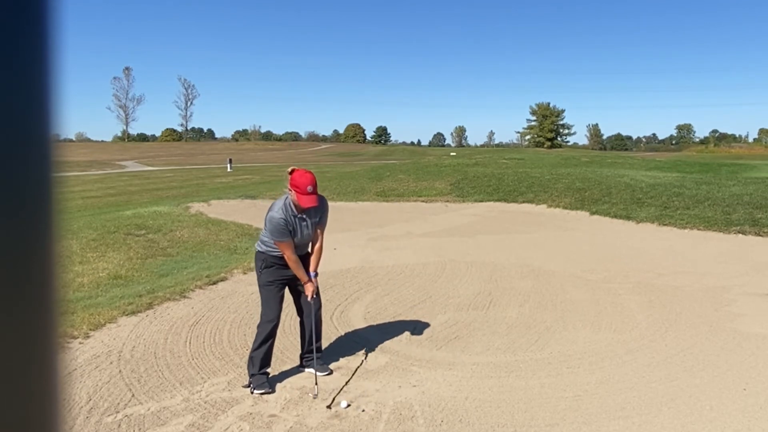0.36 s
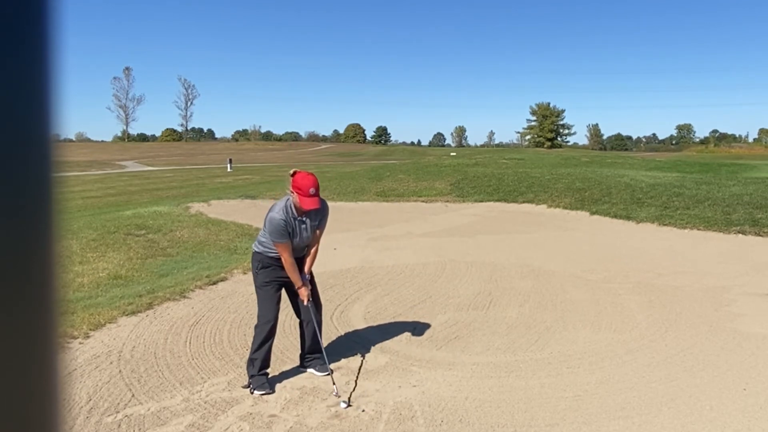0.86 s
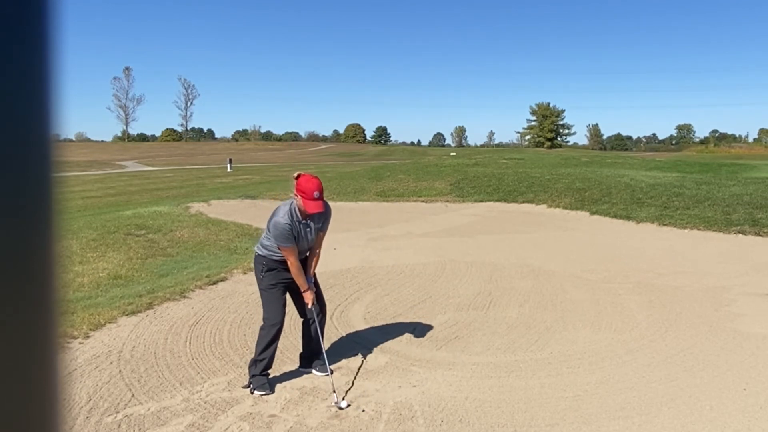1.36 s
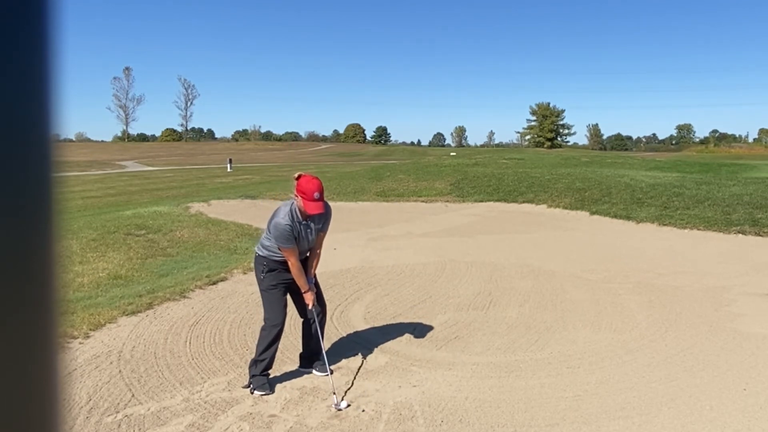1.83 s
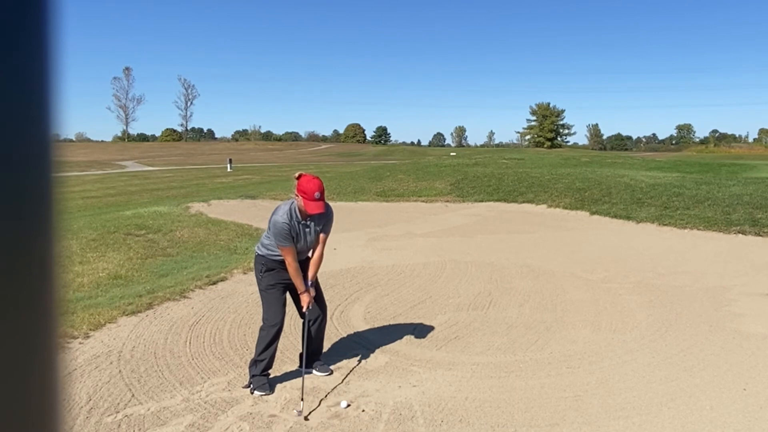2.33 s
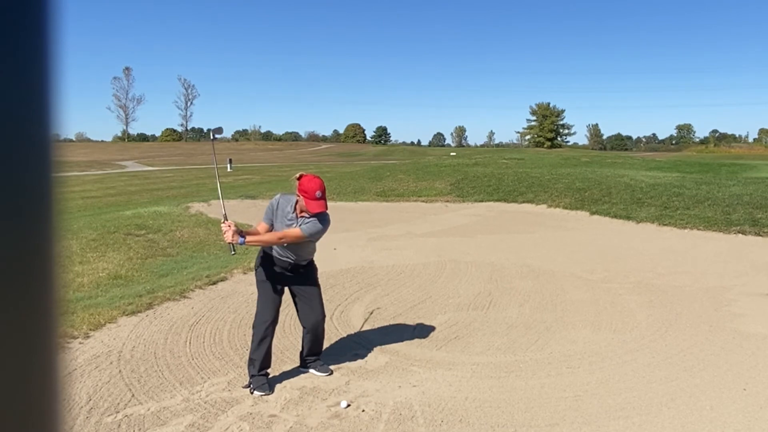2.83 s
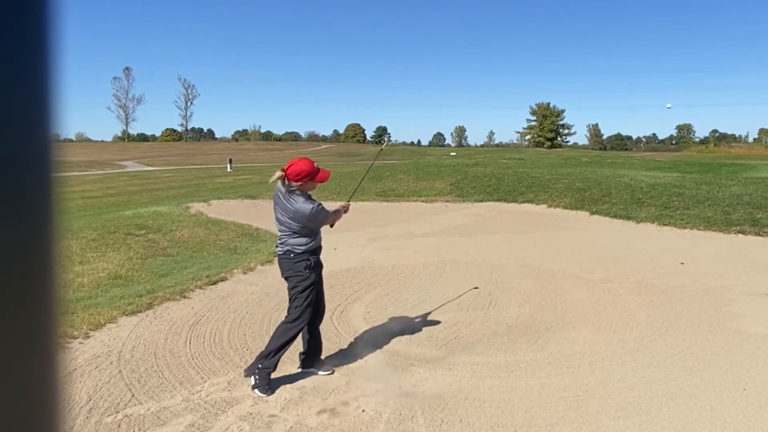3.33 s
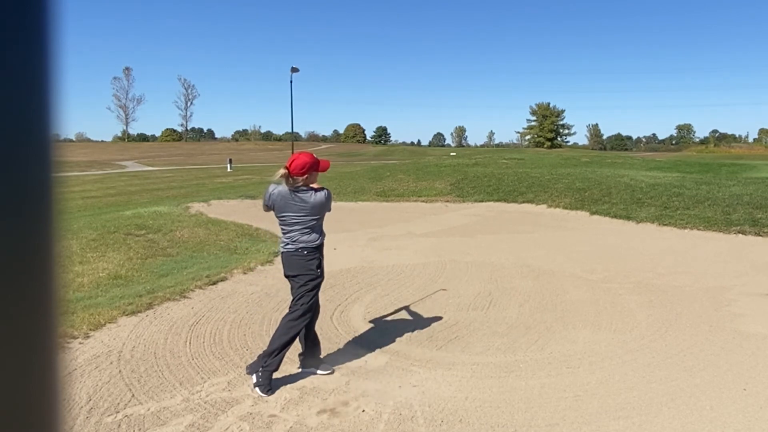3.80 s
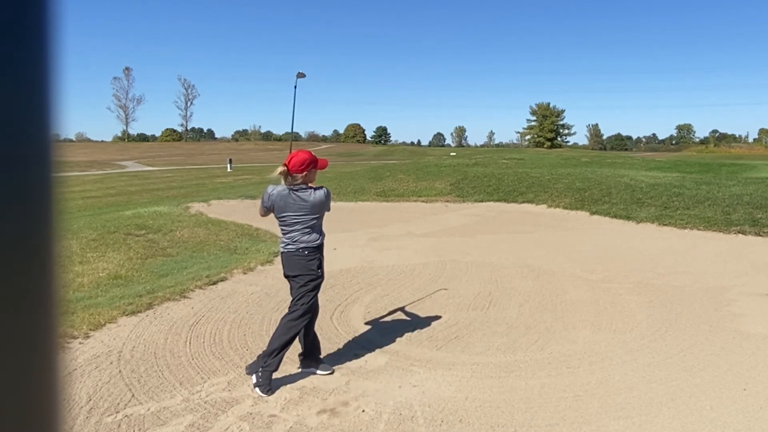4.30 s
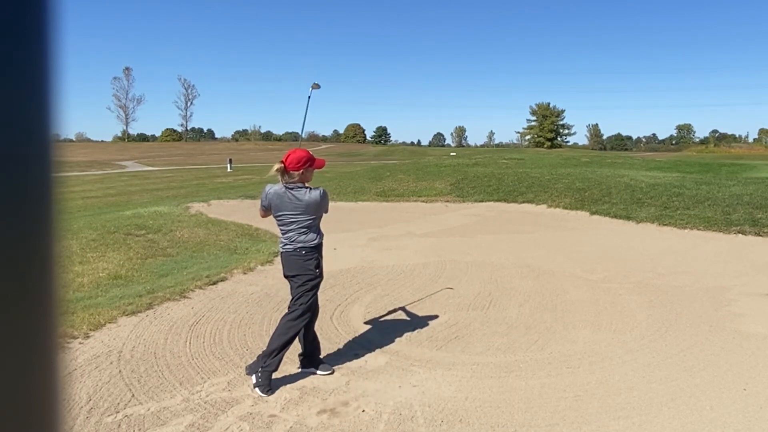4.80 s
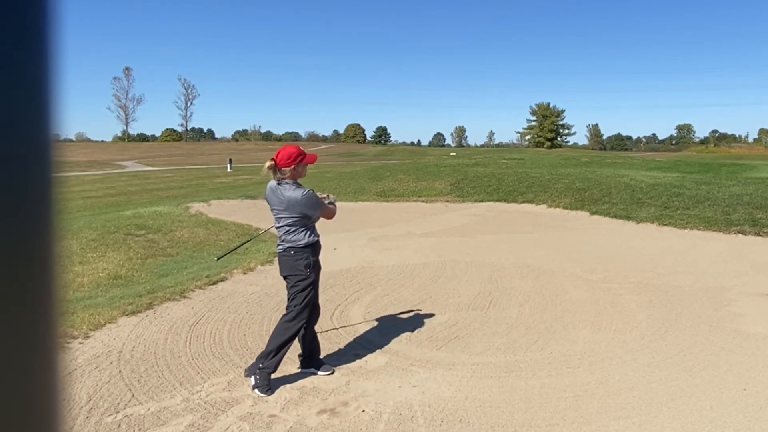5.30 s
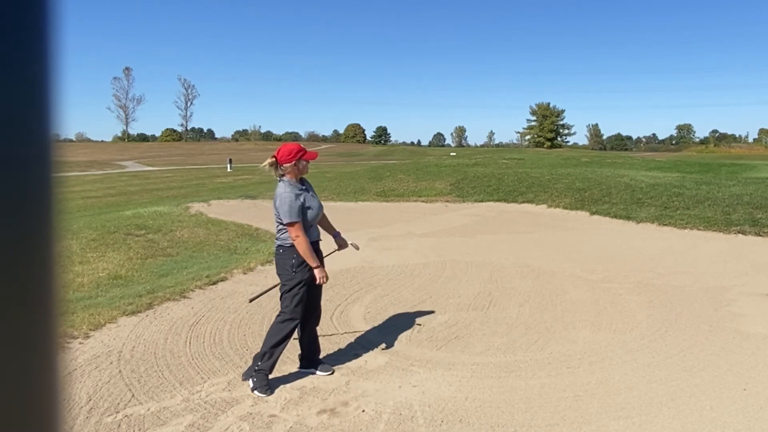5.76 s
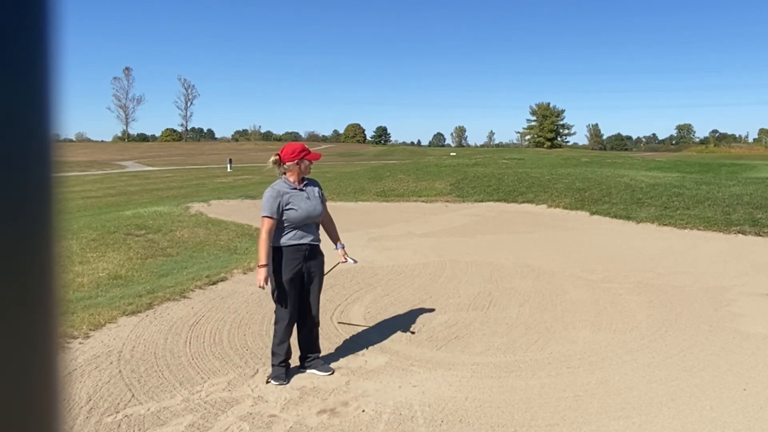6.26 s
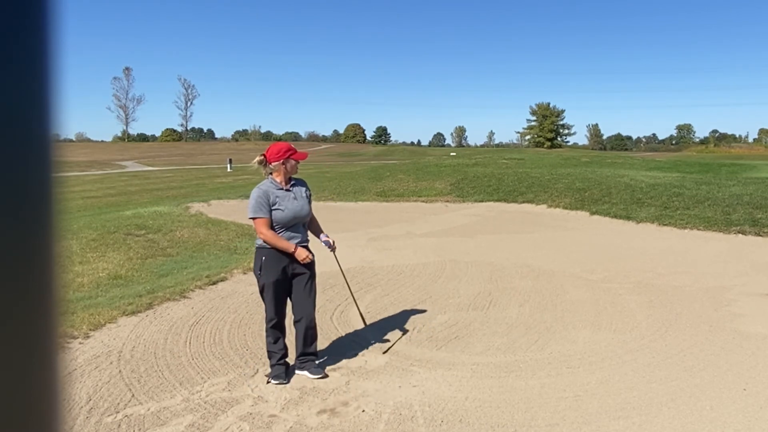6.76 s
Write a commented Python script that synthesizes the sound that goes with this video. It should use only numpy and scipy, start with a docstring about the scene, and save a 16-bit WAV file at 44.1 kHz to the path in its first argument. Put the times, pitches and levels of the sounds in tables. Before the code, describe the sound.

A stereo outdoor microphone picks up a bright bed of crickets, thin hiss of open air, soft low wind bumps and far road hum. One sharp, dry club strike in sand stands out near the middle, followed by a faint grainy spray and small clods landing. The insects continue unchanged, with a few faint gliding bird whistles far off and quiet gritty shuffles at the end.

```python
"""A golf wedge slaps into bunker sand and strikes the ball: bursts of noise, then short decaying sines.
Thrown sand rains back and feet shift later: grain-flickered noise with single knocks and clods.
Crickets of three kinds sing in strokes of arching pitch; far birds whistle gliding sines.
Shaped noise gives a light wind buffeting two microphone ports, a distant road on the right,
a low hum and the hiss of open air."""
import sys
import numpy as np
from scipy import signal
from scipy.io import wavfile
from scipy.ndimage import uniform_filter1d

SR = 44100
rng = np.random.default_rng(int(sys.argv[2]) if len(sys.argv) > 2 else 0)


def linear_from_db(decibels):
    """Turn decibels (scalar or array-like) into linear amplitude factors; 0 gives 1."""
    return 10 ** (np.asarray(decibels, float) / 20)


def pcm_store(signal):
    """Save signal as 16-bit PCM."""
    levels = np.round(np.clip(np.atleast_2d(signal), -1, 1) * 32767)
    wavfile.write(sys.argv[1], SR, levels.astype(np.int16).T)


N = 303285


def read(points, hz):
    """Value of a table on a log-frequency axis."""
    f, value = np.transpose(points)
    return np.interp(np.log(hz + 1), np.log(f + 1), value)


def amp_at(points, hz):
    """Gain of a spectrum table at the frequencies hz."""
    return linear_from_db(read(points, hz))


def curve(rows, column=1):
    """A column of a table at every sample."""
    return np.interp(np.arange(N) / SR, np.transpose(rows)[0], np.transpose(rows)[column])


def evened(x):
    """Scales to rms 1."""
    return x / np.sqrt(np.mean(x ** 2) + 1e-20)


def alike(likeness):
    """Left-right likeness that is the same at all frequencies."""
    return lambda hz: np.full_like(hz, likeness)


def add(mix, s, sound, pan_db=0, lag_s=0):
    """Mixes a sound in at s seconds; the left port may hear it later and louder."""
    for port, start, db in zip(mix, (s + lag_s, s), (pan_db / 2, -pan_db / 2)):
        at = round(start * SR)
        part = port[max(at, 0):max(at + len(sound), 0)]
        part += linear_from_db(db) * sound[max(-at, 0):][:len(part)]


def noise(colour, same, lag_s=0, patchy_db=0, size=1024, count=N):
    """Random short-time spectra with drifting patches, partly shared by the two ports; rms 1."""
    frames, hz = 4 * count // size + 5, np.fft.rfftfreq(size, 1 / SR)
    a, b, c, d, patches = rng.standard_normal((frames, len(hz), 5), dtype=np.float32).T
    patches = uniform_filter1d(patches, size=10, axis=0)
    patches = evened(uniform_filter1d(patches, size=8, axis=1))
    same = np.clip(same(hz), -1, 1)[:, None]
    right, own = a + 1j * b, c + 1j * d
    late = np.exp(-2j * np.pi * hz * lag_s)[:, None]
    left = same * late * right + np.sqrt(1 - same ** 2) * own
    z = np.array([left, right])
    z *= amp_at(colour, hz)[:, None] * linear_from_db(patchy_db * patches)
    sound = signal.istft(z, nperseg=size, noverlap=size * 3 // 4)[1]
    return evened(sound[:, :count])


# sand noise spectrum: (frequency [Hz], gain [dB])
ENTRY_COLOUR = [(88, -33.5), (150, -6), (583, -6), (1330, -8), (4180, -26), (4970, -35), (5570, -24.5),
                (6490, -26), (11500, -33.5), (14500, -39.5)]
# thin tick of first contact: (frequency [Hz], level [dB], t60 [s])
FACE = [(11400, -31, 0.0058), (13340, -33, .004)]
# club head and ball: (frequency [Hz], level re strike [dB], t60 [s], first swing: 1 outward, -1 inward)
CLUB = [(240, -13, .025, 1), (384, -7.5, 0.021, -1), (684.4, -4.5, 0.015, 1), (812.5, -16, .014, 1),
        (1110, -3.5, 0.012, -1), (1360, -3.5, 0.0076, -1), (1570, -13, .009, 1), (1850, -10, 0.015, -1),
        (2454.3, -7.5, .006, 1), (3745, -4, .018, 1), (5355, -6.5, 0.0079, 1), (6310, -29.5, .014, -1),
        (7204, -14, .005, 1), (8700, -27.5, .009, -1)]
# delay of the left port: (frequency [Hz], lag [s])
CLUB_LAG = [(400, .00011), (1300, .00007), (2500, 0), (3700, 0), (5470, .00005), (11000, 0)]
ENTRY_S, TICK_S, STRIKE_S = 3.0893, 3.0976, 3.09795
STRIKE_DB = -17.5


def hit():
    """The sole ploughs into the sand, then the face meets the ball and both ring for a few ms."""
    mix, t = np.zeros((2, N)), np.arange(2048) / SR
    plough = np.clip(t / 0.0005, 0, 1) * linear_from_db(-60 * np.maximum(t - .011, 0) / 0.022)
    entry = noise(ENTRY_COLOUR, np.ones_like, size=256, count=len(t))[0]
    add(mix, ENTRY_S, linear_from_db(-37.5) * plough * entry)
    shove = linear_from_db(-30.5 - 60 * t / 0.0379) * np.sin(2 * np.pi * 325 * t) * np.clip(t / .002, 0, 1)
    add(mix, ENTRY_S + 0.00222, shove, 1.5)
    burst = noise(ENTRY_COLOUR, np.ones_like, size=256, count=len(t))[0]  # sand bursts off the face
    add(mix, TICK_S, linear_from_db(-34.5 - 60 * t / 0.022) * burst)
    for hz, db, t60 in FACE:
        add(mix, TICK_S, linear_from_db(db - 60 * t / t60) * np.sin(2 * np.pi * hz * t), 2.5)
    contact = np.clip(t / 0.0003, 0, 1)  # the ball stays on the face a moment
    for hz, db, t60, way in CLUB:
        ring = way * linear_from_db(STRIKE_DB + db - 60 * t / t60) * np.sin(2 * np.pi * hz * t)
        add(mix, STRIKE_S, contact * ring, .8, read(CLUB_LAG, hz))
    return mix


# thrown sand: (time [s], level [dB])
SPRAY = [(3.11, -67), (3.124, -71), (3.15, -69.5), (3.18, -70), (3.22, -69.5), (3.28, -74.5), (3.34, -67.5),
         (3.39, -68.5), (3.43, -77), (3.486, -90), (3.56, -96.5)]
# share of fine dry grains, which hang longest in the air: (at start [dB], at end [dB])
SPRAY_FINE_DB = (-7, 5)
# feet shifting in the sand: (start [s], length [s], level [dB], share of fine dry grains [dB])
SCUFFS = [(5.886, 0.152, -78, -16), (6.18, .06, -77.5, -24.5), (6.29, 0.21, -74.5, -6),
          (6.45, 0.13, -75.5, -22), (6.53, 0.11, -85, 2), (6.615, 0.065, -73, -13)]
SWING_S, SWING_RISE_DB_PER_S = 3.086, 110
SWING_DB, SWING_FINE_DB = -72, -17
SCUFF_RISE, SCUFF_FALL = 0.365, 0.48  # shares of a scuff spent rising and falling


def moving_sand():
    """Levels of coarse and fine grains: the head sweeping in over the sand, spray and feet."""
    t = np.arange(N) / SR
    swing = linear_from_db(SWING_DB + SWING_RISE_DB_PER_S * np.minimum(t - SWING_S, 0)) * (t < SWING_S)
    spray = linear_from_db(np.interp(t, *np.transpose(SPRAY), left=-140, right=-140))
    spray_fine_db = np.interp(t, (SPRAY[0][0], SPRAY[-1][0]), SPRAY_FINE_DB)
    coarse = swing + spray
    fine = linear_from_db(SWING_FINE_DB) * swing + linear_from_db(spray_fine_db) * spray
    for s, length_s, db, fine_db in SCUFFS:
        shape = np.interp((t - s) / length_s, (0, SCUFF_RISE, 1 - SCUFF_FALL, 1), (0, 1, 1, 0))
        scuff = linear_from_db(db) * shape
        coarse, fine = coarse + scuff, fine + linear_from_db(fine_db) * scuff
    return coarse, fine


def patter(per_s, spread_db, steady, hold):
    """Level that jumps as larger grains land and decays by hold each sample."""
    landing = rng.random(N) < per_s / SR
    grains = linear_from_db(spread_db * np.minimum(rng.exponential(1, N), 5)) * landing
    return evened(steady + evened(signal.lfilter([1], [1, -hold], grains)))


# grain spectra: (frequency [Hz], gain [dB])
COARSE_COLOUR = [(600, -30), (1500, 5), (2500, -0.5), (3700, 1), (4600, -6.5), (7000, -45.5)]
FINE_COLOUR = [(3000, -38), (4800, -10.5), (6200, 2), (7600, -5.5), (9000, 3), (10300, -3), (11500, 0.5),
               (13000, -1.5), (13900, -3.5), (14600, -26.5)]
# soft knock early on, then clods landing and crusts breaking underfoot:
# (time [s], level before decay [dB], frequency [Hz])
KNOCKS = [(0.244, -45.5, 893), (3.1776, -49.5, 1440), (3.1775, -57.5, 3300), (3.178, -60.5, 6500),
          (3.1782, -59.5, 12000), (3.2215, -62, 11500), (3.352, -61.5, 12000), (3.197, -63.5, 3600),
          (3.241, -43, 1292), (3.382, -58, 3220), (3.4523, -68, 3000), (3.643, -63, 3381),
          (5.924, -57, 2250), (5.937, -67.5, 2877), (6.198, -58.5, 2180), (6.212, -65.5, 2700),
          (6.535, -66, 2610), (6.636, -60.5, 2280), (6.652, -63, 3100)]
HANDFUL_DB = 1.3  # rms unevenness


def sand():
    """Hiss of countless grains in uneven handfuls, flickering as larger ones land, and single knocks."""
    coarse_level, fine_level = moving_sand()
    drift = uniform_filter1d(rng.standard_normal((2, N)), size=500, axis=1)
    handfuls = linear_from_db(HANDFUL_DB * evened(uniform_filter1d(drift, size=500, axis=1)))
    coarse = noise(COARSE_COLOUR, alike(0.8), patchy_db=2.0, size=256) * coarse_level * handfuls[0]
    fine = noise(FINE_COLOUR, alike(0.5), patchy_db=2.5, size=256) * fine_level * handfuls[1]
    mix = patter(1300, spread_db=1.5, steady=0.706, hold=0.97) * coarse
    mix += patter(1500, spread_db=3.0, steady=.7, hold=.995) * fine
    t = np.arange(0, .015, 1 / SR)
    for s, db, hz in KNOCKS:  # decay per cycle is fixed, so higher ones are shorter and wider in band
        attack = np.clip(t * hz / 0.86, 0, 1)
        add(mix, s, linear_from_db(db - 2.8 * hz * t) * np.sin(2 * np.pi * hz * t) * attack)
    return mix


def stroke(length_s, top_hz, rise_hz, fall_hz, top_at, edge):
    """One wing stroke: a near sine whose pitch arches up and then sags as the wing slows."""
    u = np.arange(round(length_s * SR)) / (length_s * SR)
    before_top = np.maximum(1 - u / top_at, 0)
    after_top = np.maximum((u - top_at) / (1 - top_at), 0)
    hz = top_hz - rise_hz * before_top ** 2 - fall_hz * after_top ** 2
    return np.sin(np.pi * u) ** edge * np.sin(2 * np.pi * (np.cumsum(hz) / SR + rng.random()))


CHIRP_SPREAD_DB, CHIRP_SPREAD_HZ = 0.47, 28  # no two chirps are quite alike


def chirp(mix, first, last, db, hz, pan_db, lag_s):
    """Strokes about 9 ms apart; the first come quicker, softer and lower."""
    k = np.arange(round((last - first) / .0088) + 1)
    beat = k + 2.3 * 0.16 * np.exp(-k)
    times = first + (last - first) * (beat - beat[0]) / (beat[-1] - beat[0])
    mood = rng.standard_normal(size=2)
    db, hz = db + CHIRP_SPREAD_DB * mood[0], hz + CHIRP_SPREAD_HZ * mood[1]
    for j, s, wobble in zip(k, times, rng.standard_normal((len(k), 2))):
        start = np.exp(-j / 1.1)
        length_s = .0076 - 0.0022 * start
        top_hz = hz - 260 * start + 35 * wobble[0]
        sound = stroke(length_s, top_hz, 120, 860, 0.4, 1.0)
        stroke_db = db - 6.3 * start + 0.92 * wobble[1]
        add(mix, s - length_s / 2, linear_from_db(stroke_db) * sound, pan_db, lag_s)


# near ground cricket, one row a chirp: (first pulse [s], last pulse [s])
NEAR_CHIRPS = [(-.0362, .0257), (0.1613, .213), (0.356, .4147), (0.576, .6266), (0.7697, .8207),
               (0.96, 1.02), (1.179, 1.2392), (1.3835, 1.444), (1.6021, 1.6623), (1.805, 1.8482),
               (1.986, 2.0445), (2.207, 2.267), (2.415, 2.476), (2.637, 2.6953), (2.837, 2.8974),
               (3.044, 3.097), (3.334, 3.3936), (3.557, 3.6167), (3.7874, 3.8484), (4.023, 4.0832),
               (4.2533, 4.314), (4.468, 4.5303), (4.6747, 4.7356), (4.8936, 4.954), (5.109, 5.169),
               (5.333, 5.3932), (5.5568, 5.6173), (5.787, 5.8473), (6.018, 6.0776), (6.2358, 6.2964),
               (6.459, 6.5203), (6.69, 6.7516)]
# farther ground cricket: chirp middle [s]
FAR_CHIRPS = [.159, .475, 0.764, 1.072, 1.385, 1.711, 2.03, 2.34, 2.628, 2.969, 3.294, 3.59, 3.874, 4.151,
              4.431, 4.751, 5.03, 5.309, 5.632, 5.934, 6.199, 6.44, 6.722]
FAR_LENGTH_S = 0.077


def ground_crickets():
    """Near and farther chirping singers, on separate tracks."""
    near, far = np.zeros((2, 2, N))
    for first, last in NEAR_CHIRPS:
        chirp(near, first, last, db=-51, hz=9610.8, pan_db=4.0, lag_s=33 / 44100)
    for middle in FAR_CHIRPS:
        first, last = middle - FAR_LENGTH_S / 2, middle + FAR_LENGTH_S / 2
        chirp(far, first, last, db=-68, hz=9030, pan_db=7.5, lag_s=0.000199)
    return near, far


# steady trills: (first pulse [s], last pulse [s], top pitch [Hz], first mean level [dB], last [dB])
TRILLS = [(0.018, 1.413, 8262, -78, -82.5), (0.248, 1.079, 8555, -78, -79), (1.479, 2.226, 8416, -84, -86),
          (2.648, 3.068, 8610, -99.5, -77), (3.466, 5.051, 8240, -81.5, -89.5),
          (5.128, 5.253, 8260, -84, -88.5), (5.396, 5.689, 8610, -83.5, -82),
          (5.93, 6.112, 8620, -82, -82.5), (6.094, 6.86, 8260, -83, -91), (6.6, 6.843, 8660, -80.5, -89)]
CYCLES_PER_PULSE = 522  # a faster wing both sings higher and strokes more often
TRILL_STROKE_S, TRILL_PAN_DB = .022, 15
TRILL_LIFT_DB = 3.5  # a stroke peaks above the mean level of its trill


def trills():
    """Even rows of longer strokes, each a little louder or softer at random."""
    mix = np.zeros((2, N))
    for first, last, hz, first_db, last_db in TRILLS:
        for share in np.linspace(0, 1, round((last - first) * hz / CYCLES_PER_PULSE) + 1):
            db = first_db + share * (last_db - first_db) + 3.1 * rng.standard_normal()
            sound = linear_from_db(db + TRILL_LIFT_DB) * stroke(TRILL_STROKE_S, hz, 120, 650, 0.4, 0.93)
            add(mix, first + share * (last - first) - .002, sound, TRILL_PAN_DB, .0003)
    return mix


# field cricket wing strokes: (middle [s], level of the stronger wing [dB], mean pitch [Hz])
FIELD_STROKES = [(0.003, -73, 4830), (0.047, -73, 4780), (0.179, -90, 4840), (0.222, -73, 4920),
                 (0.263, -73, 4880), (0.322, -77.5, 4800), (0.368, -77, 4830), (0.473, -71.5, 4820),
                 (0.513, -70, 4940), (0.657, -82, 4810), (0.726, -76, 4870), (0.764, -73, 4900),
                 (0.945, -85, 4860), (0.974, -77, 4880), (1.018, -79.5, 4900), (1.213, -87, 4880),
                 (1.245, -79, 4870), (1.288, -81.5, 4870), (1.322, -88.5, 4900), (1.353, -83.5, 4920),
                 (1.388, -88.5, 4940), (1.447, -85, 4830), (1.482, -89, 4850), (1.514, -84.5, 4890),
                 (1.632, -87, 4900), (1.662, -87.5, 4880), (1.697, -78, 4870), (1.727, -84, 4920),
                 (1.772, -86, 4900), (1.932, -87.5, 4900), (1.975, -86, 4880), (2.01, -81.5, 4770),
                 (2.046, -85.5, 4860), (2.217, -85, 4860), (2.252, -83, 4870), (2.295, -84.5, 4880),
                 (2.341, -85, 4860), (2.527, -83.5, 4950), (2.617, -84, 4810), (2.652, -79, 4900),
                 (2.705, -78.5, 4830), (2.739, -83.5, 4880), (2.781, -83, 4880), (2.886, -82.5, 4820),
                 (2.929, -77, 4830), (2.974, -75.5, 4920), (3.0, -79, 4880), (3.198, -75, 4860),
                 (3.242, -74.5, 4850), (3.288, -72.5, 4810), (3.336, -83, 4840), (3.382, -79, 4880),
                 (3.414, -85.5, 4910), (3.481, -84, 4810), (3.515, -82.5, 4890), (3.557, -78, 4870),
                 (3.6, -73, 4870), (3.645, -72.5, 4870), (3.765, -85, 4960), (3.808, -79.5, 4940),
                 (3.956, -77.5, 4830), (3.996, -70, 4850), (4.023, -73.5, 4860), (4.051, -67, 4940),
                 (4.237, -79.5, 4920), (4.288, -71.5, 4850), (4.332, -70, 4780), (4.524, -75, 4880),
                 (4.562, -74.5, 4940), (4.602, -81.5, 4810), (4.647, -73, 4800), (4.691, -70, 4800),
                 (4.754, -77.5, 4810), (4.779, -76, 4910), (4.826, -73, 4880), (5.004, -81.5, 4810),
                 (5.043, -72.5, 4820), (5.075, -71.5, 4870), (5.289, -83.5, 4920), (5.321, -78, 4930),
                 (5.352, -76.5, 4870), (5.399, -75.5, 4830), (5.508, -88.5, 4860), (5.537, -78.0, 4930),
                 (5.576, -78.5, 4930), (5.648, -86, 4720), (5.689, -77.5, 4870), (5.753, -76, 4790),
                 (5.786, -78.5, 4900), (5.828, -75, 4950), (5.97, -80.5, 4830), (6.009, -72, 4890),
                 (6.054, -71.5, 4880), (6.084, -75.5, 4910), (6.277, -76.5, 4830), (6.314, -65.5, 4900),
                 (6.354, -65, 4900), (6.382, -77.5, 4860), (6.525, -80.5, 4790), (6.561, -77, 4900),
                 (6.601, -77, 4900), (6.657, -74, 4880), (6.704, -75, 4850), (6.817, -80, 4920),
                 (6.858, -82, 4940)]
FIELD_ARCH_HZ = 79.95  # the top of a stroke lies above its mean pitch


def field_crickets():
    """Two unmatched wings beat against each other in every stroke."""
    mix = np.zeros((2, N))
    for s, db, hz in FIELD_STROKES:
        top_hz = hz + FIELD_ARCH_HZ
        strong = stroke(.028, top_hz, 60, 520, 0.46, 0.85)
        weak = 0.38 * stroke(.028, top_hz - 110, 40, 200, 0.34, 1.0)
        add(mix, s - .014, linear_from_db(db) * (strong + weak), 2.2, 18 / 44100)
    return mix


def crickets():
    """All singers and a chorus; ground and grass throw a scattered tail and one echo back faintly."""
    near, far = ground_crickets()
    rest, field = far + trills(), field_crickets()
    t = np.arange(0, .25, 1 / SR)
    scatter = rng.standard_normal((2, len(t))) * linear_from_db(-60 * t / 0.39) * (t > .004)
    scatter /= np.linalg.norm(scatter[0])
    sent = linear_from_db(-22.5) * (near + rest) + linear_from_db(-13.0) * field
    tail = signal.oaconvolve(sent, scatter, axes=1)[:, :N]
    echo = np.roll(near[::-1], round(.071 * SR), axis=1)  # ports swapped
    swell = uniform_filter1d(abs(field).mean(0), round(.1 * SR))  # farther neighbours join each phrase
    chorus_colour = [(4100, -73.0), (4680, -6.5), (4900, 1), (5040, -11.0), (5500, -81.5)]  # (Hz, dB)
    chorus = abs(swell) ** 0.634 * noise(chorus_colour, alike(.5))
    return near + rest + field + linear_from_db(-32.0) * chorus + tail + linear_from_db(-32) * echo


# notes: (start [s], length [s], first pitch [Hz], last pitch [Hz], level [dB], glide levelling-off [power])
BIRDS = [(0.016, 0.046, 4100, 3005, -73, 1.45), (1.13, 0.071, 4060, 2814, -79, 1.7),
         (1.245, 0.0325, 4300, 3696, -81.5, 1.36), (1.248, 0.018, 2950, 2650, -79.5, 1.04),
         (3.46, 0.031, 3700, 3200, -80.5, 1.4), (3.72, 0.296, 2890, 3525, -85.5, 2.26),
         (4.605, 0.18, 2200, 2262, -81, 1.3), (4.903, 0.031, 4100, 3280, -86, 1.4),
         (5.972, 0.384, 2330, 2852, -82, 1.65)]
BIRD_WAVER_DB, BIRD_WAVER_S, BIRD_WAVER_HZ = 1.8, 0.006, 15


def birds():
    """Thin gliding whistles far away; moving air wavers their level and pitch."""
    mix = np.zeros((2, N))
    for s, length_s, first_hz, last_hz, db, bend in BIRDS:
        hz = last_hz + (first_hz - last_hz) * np.linspace(1, 0, round(length_s * SR)) ** bend
        waver = uniform_filter1d(rng.standard_normal(len(hz)), round(BIRD_WAVER_S * SR))
        waver = evened(uniform_filter1d(waver, size=100))
        whistle = np.sin(2 * np.pi * np.cumsum(hz + BIRD_WAVER_HZ * waver[::-1]) / SR)
        level = linear_from_db(db + BIRD_WAVER_DB * waver) * signal.windows.tukey(len(hz), .4)
        add(mix, s, level * whistle, 1.5, .0002)
    return mix


def swelling(t, middle, length_s):
    """A smooth bump of height 1."""
    return np.exp(-8 * ((t - middle) / length_s) ** 2)


# breeze before lumps and gusts: (time [s], level [dB])
WIND = [(0, -49), (.7, -50.5), (1.1, -54.5), (1.6, -53), (2.3, -50), (2.9, -51.5), (3.4, -56.5),
        (3.7, -54.5), (4.2, -57), (4.8, -55), (5.3, -53.5), (5.9, -53.5), (6.3, -52.5), (6.88, -54)]
# spectra: (frequency [Hz], gain [dB])
WIND_COLOUR = [(15, -48), (32, -27.5), (52, 8), (90, -2.5), (140, -7.5), (220, -22.5), (400, -39),
               (1500, -110)]
FLUTTER_COLOUR = [(80, -50), (140, 3), (220, -8.5), (330, -14.5), (450, -27), (1500, -100)]
# gusts: (middle [s], length [s], level [dB], flutter re push [dB])
GUSTS = [(0.069, 0.093, -48, -10), (0.292, 0.137, -43.5, -24), (0.477, 0.081, -46, -15.5),
         (0.593, 0.059, -49.5, -27), (1.296, 0.213, -50, -27), (1.547, 0.039, -51, -20.5),
         (1.801, 0.078, -46, -27.5), (1.997, 0.074, -41, -16), (2.156, 0.113, -41, -30.5),
         (2.427, 0.317, -46, -28.5), (2.604, 0.076, -44.5, 0.5), (2.678, 0.12, -48.5, -1),
         (2.754, 0.22, -51.5, -10.5), (2.899, 0.0635, -43, -9), (3.067, 0.11, -42.5, -16.5),
         (3.245, 0.134, -45.5, -13), (3.495, 0.093, -45, -23), (3.909, 0.0673, -48.5, -12),
         (4.636, 0.112, -58.5, -0.5), (5.031, 0.169, -43.5, -10), (5.224, 0.0555, -44.5, -2.5),
         (5.416, 0.058, -48, 1), (5.499, 0.079, -45.5, -3.5), (5.828, .06, -48, -20.5),
         (6.027, 0.045, -43, -4), (6.111, 0.132, -41, -1.5), (6.674, 0.065, -50, -22.5)]
BREEZE_SHARP_DB, LUMPS_DB, LUMP_S = -7, 1.5, 0.052
CONTROL_STEP = 64  # samples between control points


def wind():
    """Lumpy pressure at the ports, partly opposed; sharp gusts add a higher flutter."""
    low = noise(WIND_COLOUR, alike(-.3), patchy_db=-0.5, size=2048)
    flutter = noise(FLUTTER_COLOUR, alike(-.2), patchy_db=2.0)
    t = np.arange(0, N, CONTROL_STEP) / SR
    lump_shape = np.hanning(round(LUMP_S * SR / CONTROL_STEP))
    lumps = evened(np.convolve(rng.standard_normal(len(t)), lump_shape, "same"))
    push_power = linear_from_db(curve(WIND)[::CONTROL_STEP] + LUMPS_DB * lumps) ** 2
    flutter_power = push_power * linear_from_db(BREEZE_SHARP_DB) ** 2
    for middle, length_s, db, sharp_db in GUSTS:
        gust_power = (linear_from_db(db) * swelling(t, middle, length_s)) ** 2
        push_power = push_power + gust_power
        flutter_power = flutter_power + linear_from_db(sharp_db) ** 2 * gust_power
    push = np.interp(np.arange(N) / SR, t, np.sqrt(push_power))
    buffet = np.interp(np.arange(N) / SR, t, np.sqrt(flutter_power))
    return (push * low + buffet * flutter) * linear_from_db([[-2.2], [2.2]])


# road hum, and brighter tyre hiss of a car drawing away: (time [s], level [dB])
ROAD = [(0, -57.5), (2.4, -56.5), (4.2, -56), (5.1, -55.5), (6.5, -54.5), (6.88, -56.5)]
TYRES = [(0, -75.5), (.9, -74), (1.6, -78.5), (3, -78.5), (4.5, -81.5), (6.88, -82)]
# spectra: (frequency [Hz], gain [dB])
ROAD_COLOUR = [(150, -20), (300, -4), (430, -2.5), (690, 1.5), (950, 2.5), (1200, -6), (1460, -15),
               (1720, -21.5), (2000, -27), (2500, -34.5), (4000, -71.5)]
TYRE_COLOUR = [(1100, -38.5), (1600, 1), (1950, -2.5), (2250, -15.5), (2800, -44)]
HUM_COLOUR = [(64, -110), (81, -2.5), (89, -1.5), (108, -110)]
AIR_COLOUR = [(1200, -13.5), (2500, 5), (3800, -2.5), (6200, 0.5), (7400, -1), (8900, 7), (10200, -3),
              (10900, -16), (13500, -19)]
# road at the two ports: (frequency [Hz], left-right likeness [0..1])
ROAD_SAME = [(250, 0.23), (450, 0.74), (800, 0.896), (1300, 0.641), (2000, 0.35), (2400, 0.2)]
ROAD_LAG_S = 22.47 / 44100  # left port hears the road later
HUM_DB, AIR_DB = -59, -80


def background():
    """The far road, a low wavering hum and the thin hiss of open air, all shaped noise."""
    def road_same(hz):
        """Likeness of the road at the two ports, falling away from mid frequencies."""
        return read(ROAD_SAME, hz)

    road = linear_from_db(curve(ROAD)) * noise(ROAD_COLOUR, road_same, ROAD_LAG_S, patchy_db=1.7141)
    tyres = linear_from_db(curve(TYRES)) * noise(TYRE_COLOUR, road_same, ROAD_LAG_S, patchy_db=3.0)
    air = linear_from_db(AIR_DB) * noise(AIR_COLOUR, alike(0.12), patchy_db=3.0)
    hum = linear_from_db(HUM_DB) * noise(HUM_COLOUR, alike(0.2695), size=8192)
    return hum + (road + tyres) * linear_from_db([[-.7], [.7]]) + air * linear_from_db([[-.8], [.8]])


def scene():
    """Everything at the two ports."""
    return hit() + sand() + crickets() + birds() + wind() + background()


def roll_off(x):
    """The treble ends steeply here."""
    return signal.sosfilt(signal.butter(12, 14930, fs=SR, output="sos"), x)


def record(dry):
    """The microphone fades out in the top octave."""
    rolled = signal.sosfilt(signal.butter(N=8, Wn=13900, fs=SR, output="sos"), dry)
    return roll_off(rolled)


dry = scene()
out = record(dry)
pcm_store(out)
```